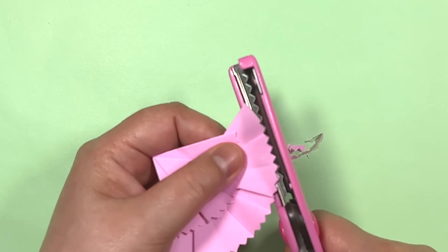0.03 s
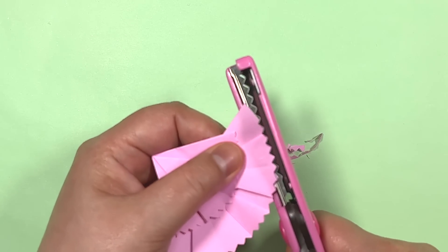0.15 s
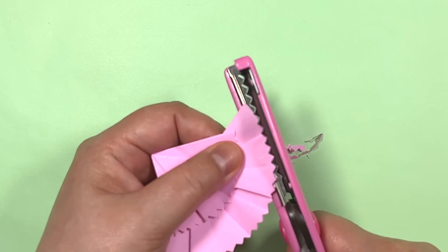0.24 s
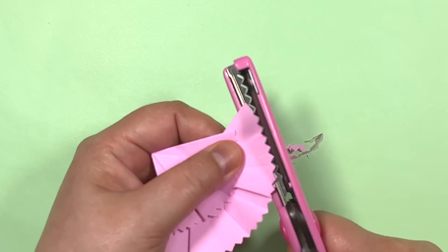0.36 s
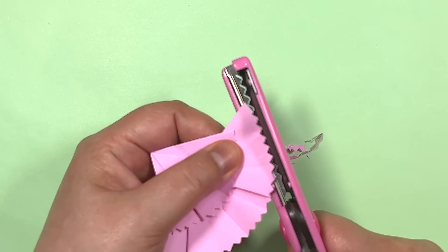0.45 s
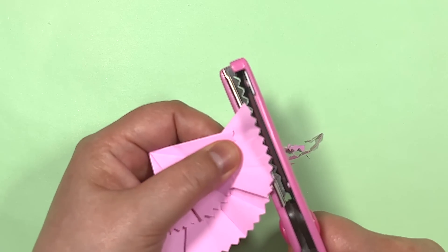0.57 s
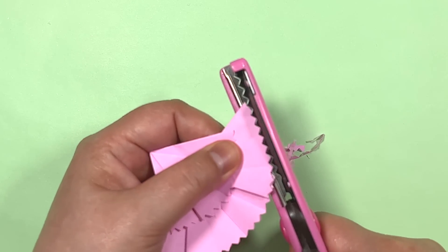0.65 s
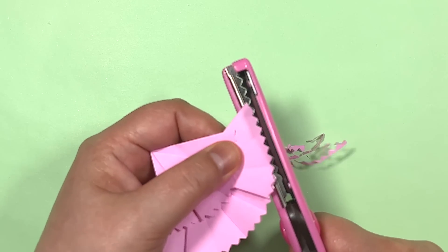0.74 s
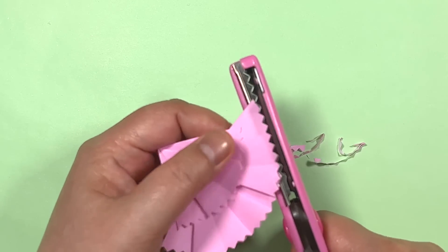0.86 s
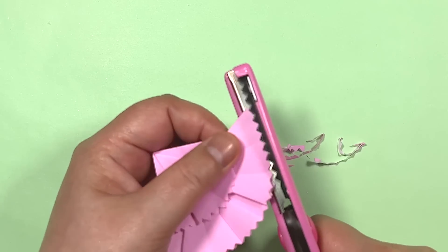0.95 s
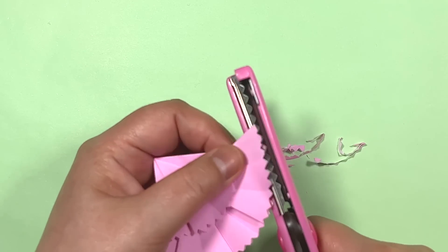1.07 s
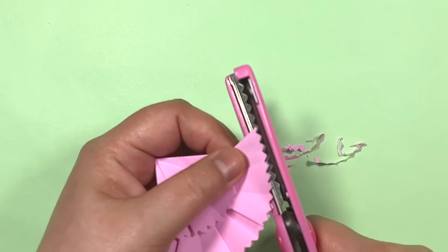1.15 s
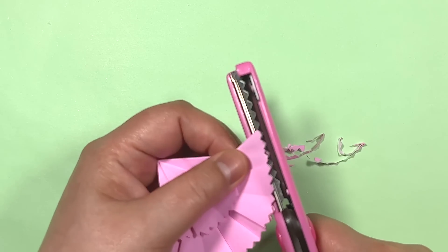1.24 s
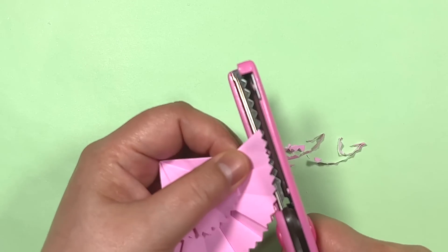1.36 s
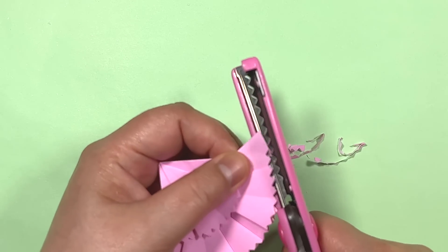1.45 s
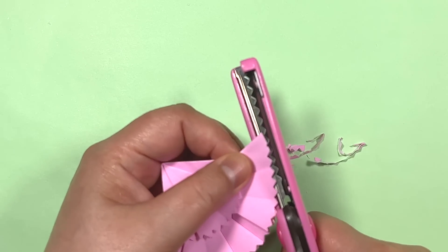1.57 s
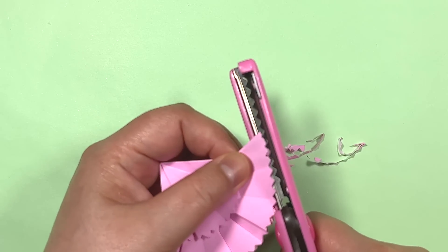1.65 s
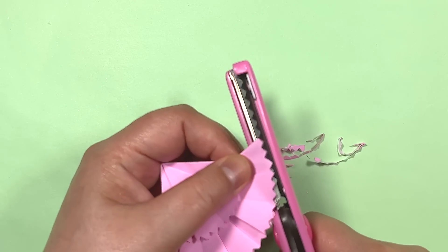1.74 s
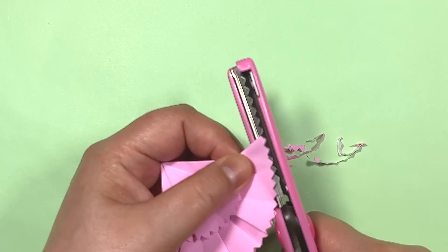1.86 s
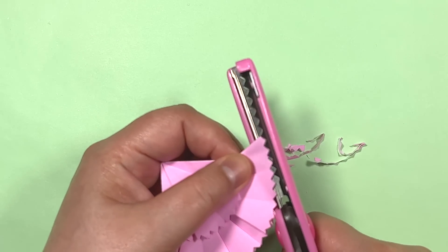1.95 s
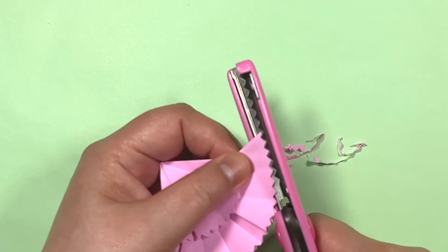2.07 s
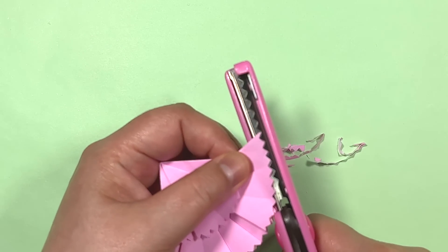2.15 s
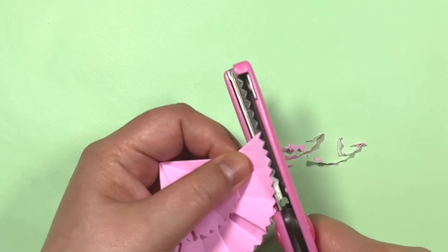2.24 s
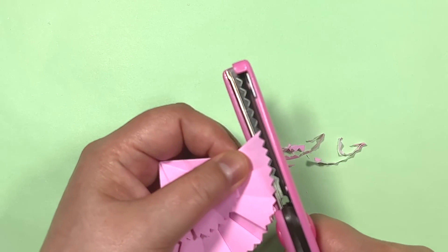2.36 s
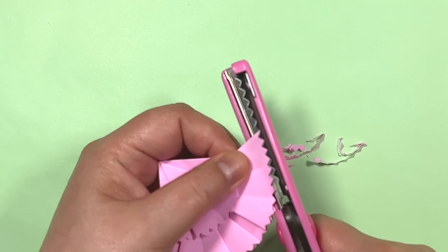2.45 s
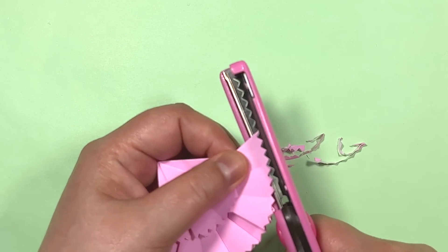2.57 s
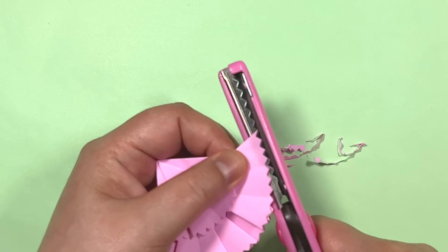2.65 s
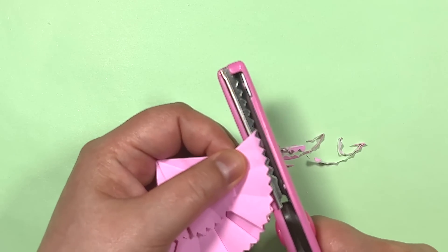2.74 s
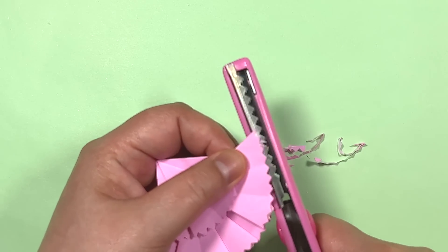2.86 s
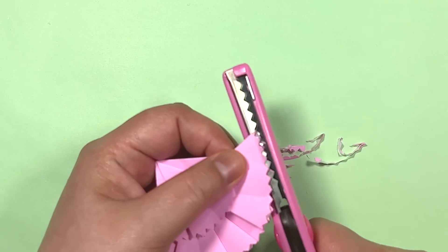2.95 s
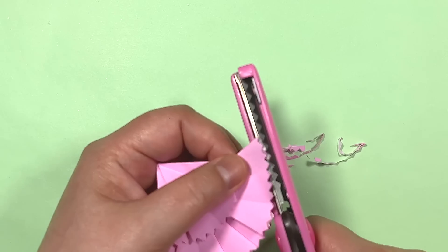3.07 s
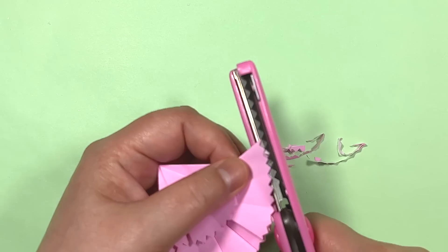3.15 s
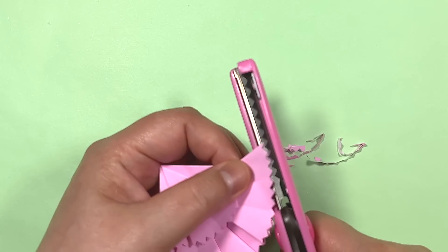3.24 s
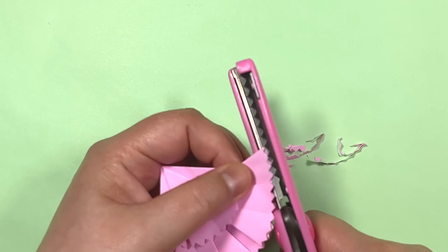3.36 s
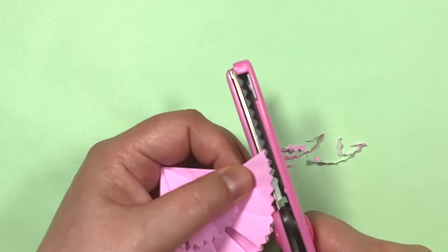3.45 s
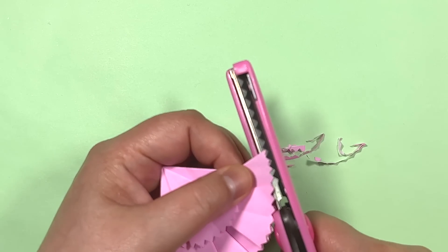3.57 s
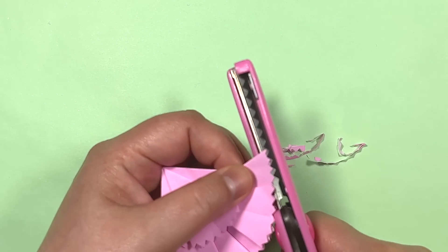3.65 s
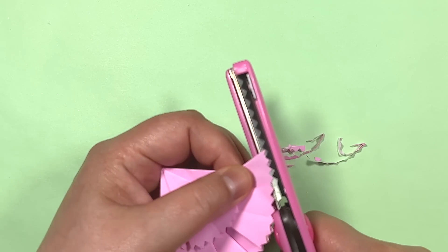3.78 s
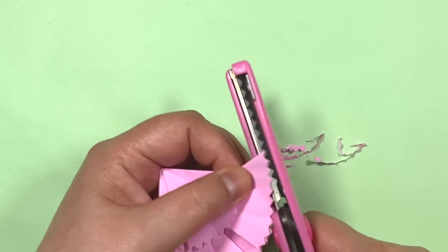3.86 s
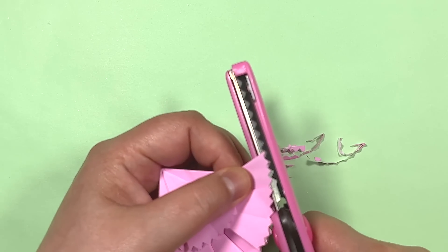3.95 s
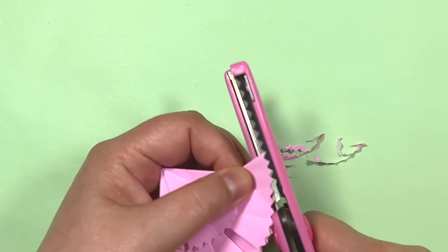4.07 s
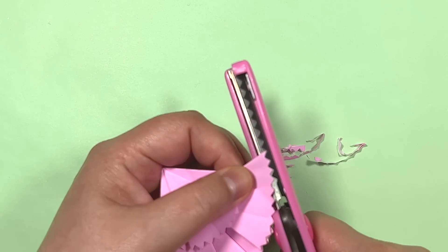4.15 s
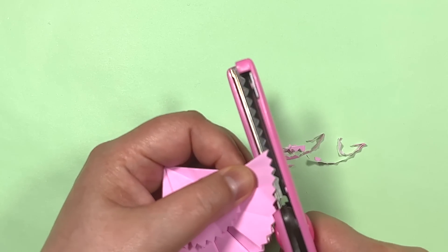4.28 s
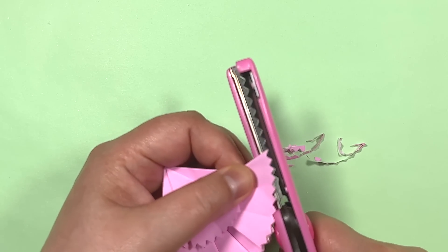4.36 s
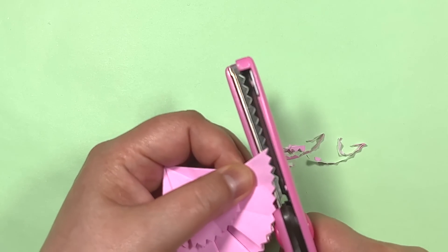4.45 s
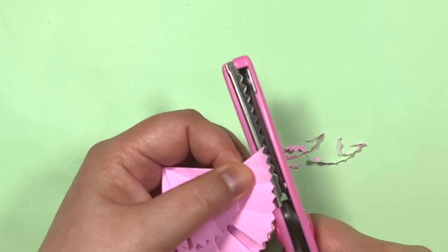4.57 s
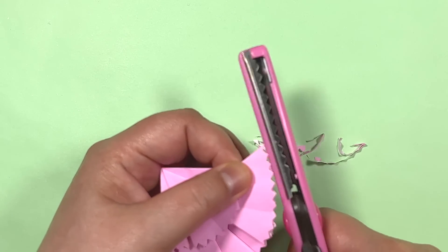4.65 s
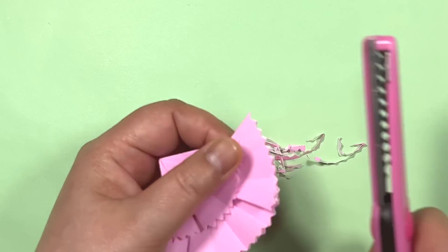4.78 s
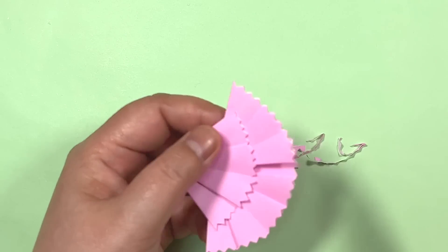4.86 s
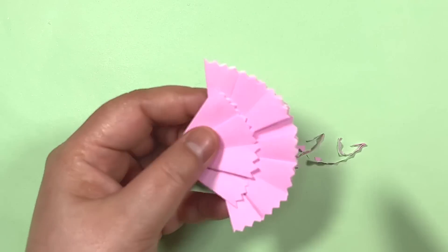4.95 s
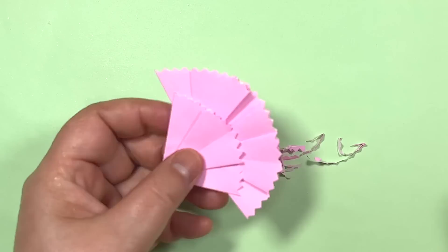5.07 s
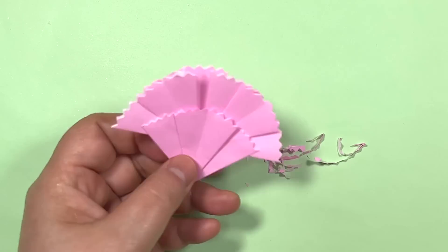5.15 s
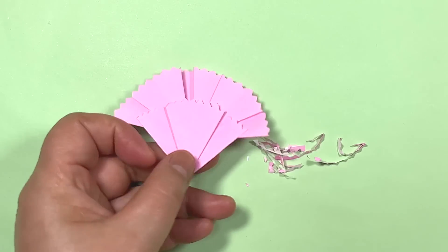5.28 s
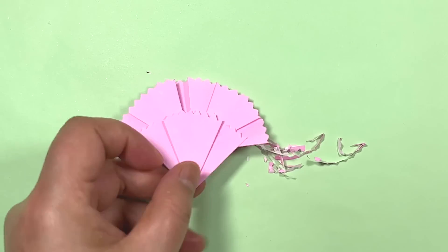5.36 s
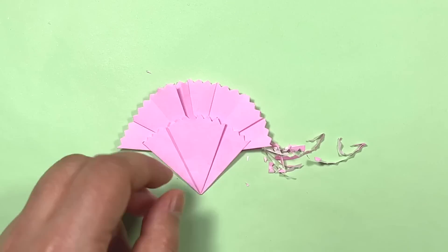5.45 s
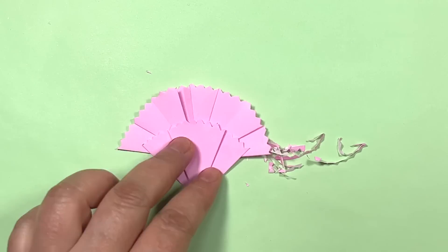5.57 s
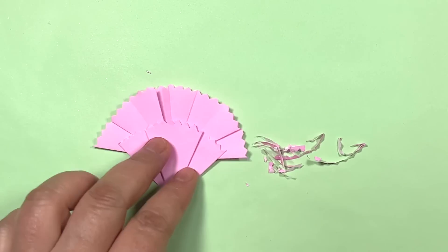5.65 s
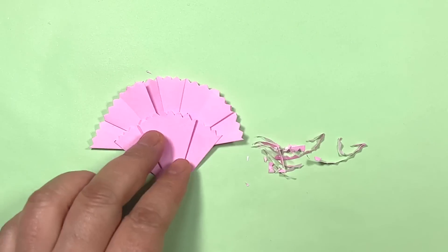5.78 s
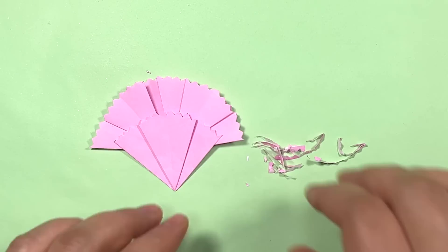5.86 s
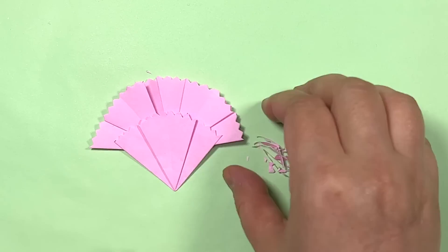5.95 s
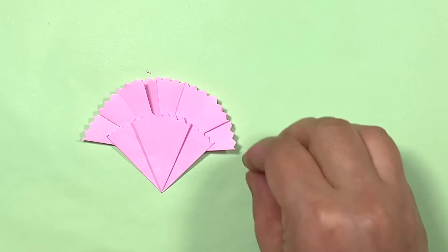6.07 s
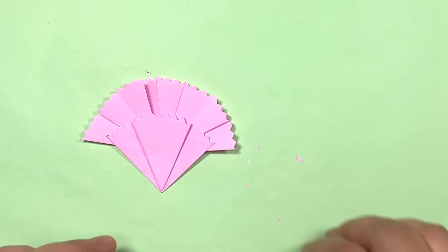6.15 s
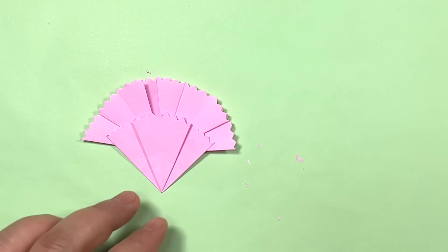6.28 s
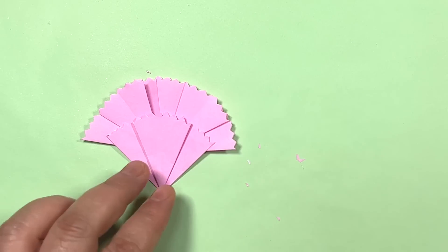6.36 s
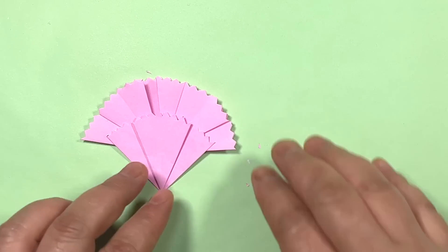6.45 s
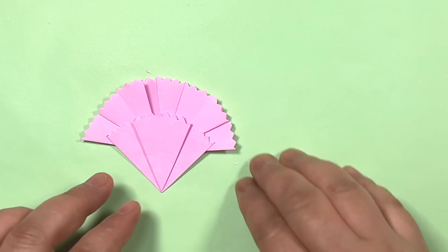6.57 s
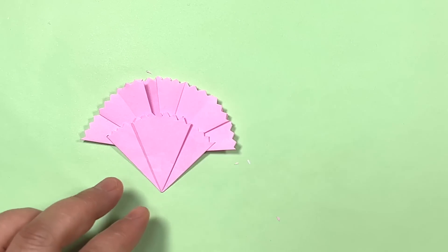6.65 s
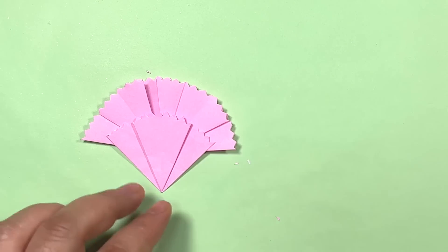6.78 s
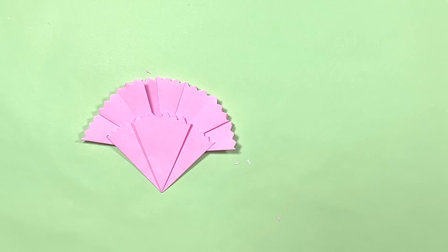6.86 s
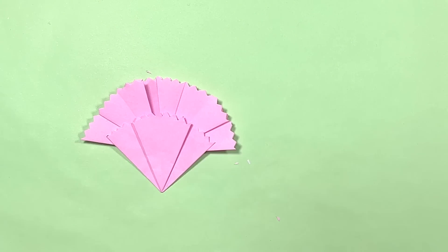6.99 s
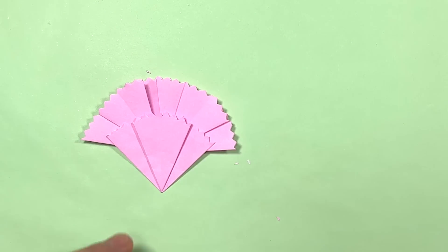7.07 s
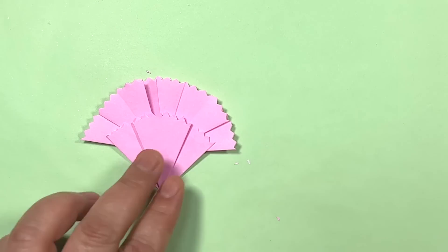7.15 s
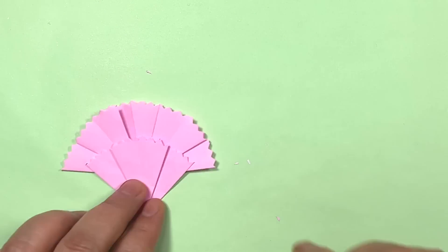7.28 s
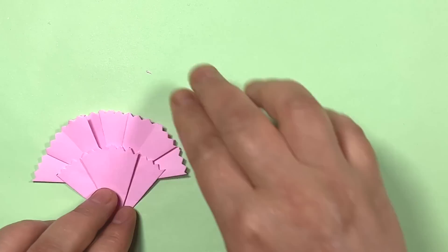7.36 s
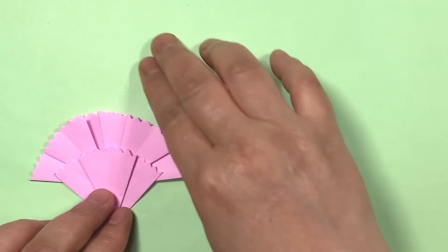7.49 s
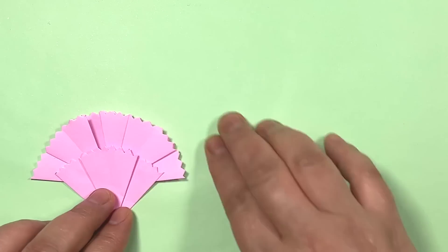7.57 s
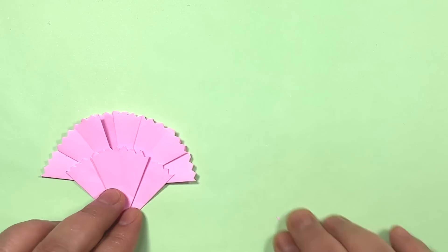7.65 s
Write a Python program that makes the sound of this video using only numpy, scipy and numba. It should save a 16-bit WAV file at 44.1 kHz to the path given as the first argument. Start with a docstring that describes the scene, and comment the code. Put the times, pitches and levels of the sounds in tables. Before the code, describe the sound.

Crisp metallic snips and crunches of folded paper with light creaks between, followed by paper slaps, rustling and two hissing hand sweeps in a quiet room.

```python
"""Pinking shears and a paper fan

Pinking shears bite through a folded paper fan on a table in a small room, heard alike in both channels.
Teeth snap the paper as bursts of fibre clicks that ring the blades, and the handles thud as damped swings.
The paper creaks and flexes between cuts; the fan is then laid down with slaps, slides and a squeak.
A hand sweeps the scraps away as filtered hiss, over room air and a faint appliance hum of wavering sines."""
import sys
import numpy as np
from scipy import signal
from scipy.fft import rfft, irfft
from scipy.io import wavfile
from scipy.ndimage import uniform_filter1d
from numba import njit

SR = 44100
rng = np.random.default_rng(int(sys.argv[2]) if len(sys.argv) > 2 else 0)


def persist_wave(psi):
    """Save psi, clipped to +-1, as 16-bit WAV."""
    counts = np.round(np.clip(psi, -1, 1) * 32767).astype(np.int16)
    wavfile.write(sys.argv[1], SR, np.atleast_2d(counts).T)


N = 340452


def db_to_gain(db):
    """Logarithmic level: 20 dB is a factor of ten in amplitude."""
    return 10 ** (np.asarray(db) / 20)


def unit(x):
    """Normalisation: scale a signal to an rms of 1."""
    return x / np.sqrt(np.mean(x ** 2))


def colour(x, points, size=2048):
    """Minimum-phase filtering: a folded cepstrum gives a causal response through (Hz, dB) points."""
    hz, db = np.transpose(points)
    bins_hz = np.maximum(np.arange(size // 2 + 1) * SR / size, 1)
    curve_db = np.interp(np.log(bins_hz), np.log(hz), db)
    cepstrum = irfft(np.log(db_to_gain(curve_db)))
    cepstrum[1:size // 2] *= 2
    cepstrum[size // 2 + 1:] = 0
    response = irfft(np.exp(rfft(cepstrum)))
    return signal.fftconvolve(x, response)[:len(x)]


def ring(x, modes):
    """Modal resonance: a sum of narrow band-passes, each given as (Hz, width in Hz, dB)."""
    total = 0
    for hz, width, db in modes:
        b, a = signal.iirpeak(hz, hz / width, SR)
        total = total + db_to_gain(db) * signal.lfilter(b, a, x)
    return total


def walk(rate):
    """Slow fluctuation: random steps at a rate in Hz, smoothed and scaled to an rms of 1."""
    hold = max(int(SR / rate), 1)
    steps = np.repeat(rng.standard_normal(N // hold + 1), hold)
    return unit(uniform_filter1d(steps, hold)[:N])


def grains(count, spread_db):
    """Granular noise: dense fibre clicks of very unequal size."""
    sizes = db_to_gain(spread_db * rng.standard_normal(count))
    return unit(rng.standard_normal(count) * sizes)


def add(track, s, sound):
    """Superposition: mix a sound in at a time in seconds."""
    i = max(int(s * SR), 0)
    track[i:i + len(sound)] += sound[:N - i]


def burst(length, fall_s, spread_db, count=3000):
    """Contact noise: grains last while the contact gives way, then decay exponentially."""
    t = np.arange(count) / SR
    fall = np.exp(-np.maximum(t - 0.77 * length, 0) / fall_s)
    onset = 1 - np.exp(-t / 0.00025)
    return grains(count, spread_db) * fall * onset


def strength(sound, db, length):
    """Energy equivalence: a short sound gets the energy of a level held for a length in seconds."""
    return sound * db_to_gain(db) * np.sqrt(length * SR / np.sum(sound ** 2))


def movement_gain(rows):
    """Gaussian envelopes: each (middle s, dB, half length s) swells and fades, adding in power."""
    t = np.arange(N) / SR
    return np.sqrt(sum(db_to_gain(2 * db) * np.exp(-2 * ((t - s) / half) ** 2) for s, db, half in rows))


# Spectrum of the room air. Each row: frequency in Hz, gain in dB.
ROOM_SPECTRUM = [(25,-20.5), (90,3), (200,-4), (500,-7), (2000,-10), (3500,-15), (11000,-19.5), (16000,-30)]
ROOM_DB = -60.5


def room_air():
    """Stationary noise: steady coloured air sound at a fixed rms level."""
    return unit(colour(rng.standard_normal(N), ROOM_SPECTRUM)) * db_to_gain(ROOM_DB)


# Partials of the appliance hum. Each row: frequency in Hz, rms level in dB.
HUM_PARTIALS = [(444.3, -68), (888.6, -81), (1333, -77)]


def appliance_hum():
    """Phase modulation: steady sines share a wandering time base, so their pitch wavers together."""
    t = np.arange(N) / SR + 0.0001 * walk(2.21)
    return sum(np.sqrt(2) * db_to_gain(db) * np.sin(2 * np.pi * hz * t) for hz, db in HUM_PARTIALS)


# The hands lean on the table. Each row: middle in seconds, level in dB, half length in seconds.
LEANING_HANDS = [(0.01,-53,0.031), (0.52,-69,0.34), (5.55,-60.5,0.59)]
SETTLE_S, SETTLE_DB = 0.025, -2.5  # decay of the shaking after each thud, and its level


def rumble(knocks):
    """Energy storage: low noise follows the leaning hands and the leaky average of thud power."""
    x = colour(rng.standard_normal(N), [(30, -27), (75, 3), (170, -3.5), (330, -6.5), (2000, -44.0)])
    keep = np.exp(-1 / (SETTLE_S * SR))
    shaking = signal.lfilter([1 - keep], [1, -keep], knocks ** 2 + 1e-18)  # power stays above zero
    power = db_to_gain(2 * SETTLE_DB) * shaking + movement_gain(LEANING_HANDS) ** 2
    return unit(x) * np.sqrt(power)


# The heel of the hand comes down softly. Each row: start in seconds, level in dB.
HAND_BUMPS = [(0.02,-44), (0.745,-48), (5.855,-46), (5.945,-43), (6.022,-46)]
BUMP_HZ, BUMP_FALL_S = 88, 0.0063
# Low swings of handles and table top. Each row: nominal frequency in Hz, fall in seconds, level in dB.
HANDLE_SWINGS = [(180, 0.006, -2.5), (95, 0.007, -9.5)]
THUD_LAG_S = 0.0028  # a thud follows its contact


def thuds(rows, swings, count=4000):
    """Damped oscillation: each contact sets off low swings of alternating sign and varying pitch."""
    out, t = np.zeros(N), np.arange(count) / SR
    for s, *_, db in rows:
        for k, (nominal_hz, fall_s, swing_db) in enumerate(swings):
            oscillation = np.sin(2 * np.pi * nominal_hz * rng.uniform(0.82, 1.1) * t)
            envelope = np.exp(-t / fall_s) * (1 - np.exp(-2 * nominal_hz * t))
            swing = np.gradient(oscillation * envelope)
            swing = swing / np.abs(swing).max()
            add(out, s + THUD_LAG_S, (-1) ** k * db_to_gain(db + swing_db) * swing)
    return out


# Spectrum of cut paper. Each row: frequency in Hz, gain in dB.
CUT_SPECTRUM = [(100,-18), (520,-3.5), (760,-0.5), (2400,-1), (3500,-3), (5800,-5.5), (8000,-2),
                (11500,-0.5), (12700,-10.5), (14000,-7.5), (16000,-22)]
# Resonances of blades and folded paper. Each row: frequency in Hz, width in Hz, gain in dB.
BLADE_MODES = [(3020, 110, -3.5), (4730, 140, -8), (7120, 170, 0.5), (9780, 610, -5.5), (12800, 290, -13),
               (13600, 1200, -4)]


def fracture(db, length, treble_db, low_db, fall_s):
    """Fracture noise: breaking fibres excite the blade modes, with given low-mid and treble weight."""
    x = colour(burst(length, fall_s, spread_db=4.0), CUT_SPECTRUM)
    x = x + db_to_gain(1.0) * ring(x, BLADE_MODES)
    tilt = [(450, -4.0), (850, low_db), (1900, 0.58), (4200, -3.0), (7000, treble_db)]
    return strength(colour(x, tilt), db, length)


# Low-mid weight as the grip on the fan changes. Each row: time in seconds, gain in dB.
GRIP_WEIGHT = [(.2,-10), (.6,1), (2.6,-7), (4.5,-8)]


def bite(s, db, length, treble_db):
    """Load-dependent fracture: the grip sets the low-mids, and longer bites die out more slowly."""
    low_db = np.interp(s, *np.transpose(GRIP_WEIGHT))
    return fracture(db, length, treble_db, low_db, fall_s=0.0005 + 0.52 * length)


# The jaws scrape to a new bite and the handles knock.
# Each row: start in seconds, level in dB, treble in dB, thud level in dB.
JAW_CATCHES = [(0.178,-44.5,-1.5,-46.5), (0.3133,-37,-2.5,-34), (0.409,-31,-3.5,-36.5),
               (0.540,-40,-2,-32.5), (0.552,-44.5,-6,-53), (2.283,-44.5,-4,-40), (2.390,-44,-4.5,-41),
               (2.451,-40.5,-7,-45), (4.328,-48.5,0,-63), (4.3877,-35.5,-6,-47)]
CATCH_S, DRAG_DB, DRAG_S = 0.005, -23, 0.012  # edges drag before and after; DRAG_DB re the catch
# A tooth snaps through the paper and jolts the handles.
# Each row: start in seconds, level in dB, length in seconds, treble in dB, thud level in dB.
TOOTH_SNAPS = [(0.6181,-10,0.0021,-1.5,-29), (0.648,-33.5,0.0036,-1,-50), (0.825,-28,0.0016,-9.5,-54),
               (0.8585,-22,0.0012,-1,-50), (0.931,-40,0.0013,-15,-56), (0.999,-33,0.0029,-3.5,-50),
               (1.0232,-35.5,0.0031,-1.5,-66), (2.6413,-22.5,0.0067,0,-38.5),
               (2.688,-30.5,0.0019,-15.5,-36), (2.72,-35,0.0042,-13,-46), (2.7339,-25.5,0.0025,-3,-44),
               (2.794,-29,0.0031,-4.5,-67), (2.98,-29,0.0052,-5.5,-38.5), (3.005,-33,0.0042,-6.5,-54),
               (4.435,-39.5,0.0034,-12,-51), (4.448,-30,0.0027,-10,-53), (4.473,-21,0.00079,0,-45),
               (4.528,-38.5,0.0026,-18,-43), (4.549,-38,0.0035,-14,-49), (4.563,-26.5,0.0059,-7,-40.5)]
# First fibres give before a snap: lead, level re the snap, and the snap level above which it stops rising.
STRAIN_LEAD_S, STRAIN_DB, STRAIN_LIMIT_DB = 0.0042, -19.5, -31.5
# Blades crunch through a thick fold.
# Each row: start in seconds, level in dB, length in seconds, treble in dB, thud level in dB.
FOLD_CRUNCHES = [(0.944,-36,0.028,-5,-39), (2.651,-34.5,0.015,-4,-47), (2.947,-26,0.02,-3,-40.5),
                 (4.578,-32,0.02,-7,-45)]
# Spacing of the paper layers, random timing and level spread, length of one layer's snap.
LAYER_S, LAYER_JITTER_S, LAYER_SCATTER_DB, LAYER_SNAP_S = 0.0052, 0.0008, 3.5, 0.004
# Teeth that catch hard and ring one blade mode. Each row: start in seconds, level in dB, frequency in Hz.
BLADE_PINGS = [(0.621,-6,12100), (2.646,-14.5,3000), (2.689,-24,2900), (2.736,-15,2990), (2.793,-23.5,2080),
               (2.957,-21,2760), (2.986,-16.5,7160), (4.472,-14.5,4970), (4.567,-18,2790)]
PING_CYCLES = 4.1  # cycles per decay time, so higher modes die sooner


def shears(count=2000):
    """Stick and fracture: edges drag and catch, teeth strain and snap, folds crunch, blades ring damped."""
    out, t = np.zeros(N), np.arange(count) / SR
    for s, db, treble_db, _ in JAW_CATCHES:
        add(out, s - CATCH_S, bite(s, db + DRAG_DB, CATCH_S, treble_db))
        add(out, s, bite(s, db, CATCH_S, treble_db))
        add(out, s + CATCH_S, bite(s, db + DRAG_DB, DRAG_S, treble_db))
    for s, db, length, treble_db, _ in TOOTH_SNAPS:
        strain_db = min(db, STRAIN_LIMIT_DB) + STRAIN_DB
        add(out, s - STRAIN_LEAD_S, bite(s, strain_db, STRAIN_LEAD_S, treble_db))
        add(out, s, bite(s, db, length, treble_db))
    for s, db, length, treble_db, _ in FOLD_CRUNCHES:
        for layer_s in np.arange(s, s + length, LAYER_S):
            late, louder = rng.standard_normal(2)
            layer_db = db + LAYER_SCATTER_DB * louder
            add(out, layer_s + LAYER_JITTER_S * late, bite(s, layer_db, LAYER_SNAP_S, treble_db))
    for s, db, hz in BLADE_PINGS:
        add(out, s, db_to_gain(db) * np.sin(2 * np.pi * hz * t) * np.exp(-hz * t / PING_CYCLES))
    return out


# Folded paper flexes against the blades. Each row: middle in seconds, level in dB, half length in seconds.
PAPER_FLEXING = [(0.818,-53.5,0.03), (0.98,-48,0.027), (1.12,-57.5,0.092), (1.70,-56,0.046),
                 (1.803,-47,0.01), (1.998,-47.5,0.018), (2.27,-57.5,0.017), (2.84,-56,0.12),
                 (3.275,-50.5,0.017), (3.35,-58.5,0.073)]
RELAX_LAG_S, RELAX_DB, RELAX_HALF_S = 0.01, -52.5, 0.022  # the paper springs back after each cut
# Spectrum of flexing paper. Each row: frequency in Hz, gain in dB.
FLEX_SPECTRUM = [(400,-18), (800,-7), (1200,1), (2050,4), (3000,-8), (6000,-14), (10500,-15), (16000,-40)]
# The fan slides over fingers and table. Each row: middle in seconds, level in dB, half length in seconds.
FAN_SLIDING = [(4.78,-54.5,0.039), (5.237,-52,0.038), (5.39,-50.5,0.1), (5.66,-55,0.23), (5.92,-59.5,0.14)]
# Spectrum of sliding paper. Each row: frequency in Hz, gain in dB.
RUSTLE_SPECTRUM = [(120,-28), (300,1.5), (1900,-2), (3600,-6.5), (4600,-5.5), (5400,-11), (11000,-12),
                   (16000,-29)]


def rustle(rows, spectrum, rate, fits_db, slide_db, crackle_db):
    """Stick-slip friction: paper slips in fits and starts, with random crackles at a rate per second."""
    fits = db_to_gain(fits_db * np.tanh(walk(140)))
    slide = unit(colour(grains(N, spread_db=5.5), spectrum) * fits)
    clicks = (rng.random(N) < rate / SR) * rng.standard_normal(N)
    crackle = signal.fftconvolve(clicks, burst(0.00038, 0.00048, spread_db=1.0))[:N]
    crackle = unit(colour(crackle, spectrum))
    return (db_to_gain(slide_db) * slide + db_to_gain(crackle_db) * crackle) * movement_gain(rows)


# The fingers turn the fan and creases tick.
# Each row: start in seconds, end in seconds, ticks per second, mean level in dB.
FAN_TURNS = [(1.04, 2.15, 21, -50), (3.034, 3.65, 8.6, -51), (5.21, 5.45, 40, -48)]
TICK_SCATTER_DB, TICK_TREBLE_DB = 8.5, -6  # level spread either way, mean treble
# Single creases give way; the row at 6.349 s is a paper scrap ticking under the sweeping hand. # Each row:
# start in seconds, level in dB, treble in dB, frequency of the panel ring in Hz.
CREASE_CREAKS = [(1.1853,-38.5,-5,2250), (1.424,-40,-7,1600), (1.491,-45,1,2000), (1.589,-50,11,2400),
                 (1.63,-41,4,2000), (1.645,-46,7,2600), (1.6867,-39.5,-6,1500), (1.774,-32,3.5,2440),
                 (1.974,-43.5,-3,2100), (1.9934,-40,-20,1750), (2.096,-43.5,6.5,2180),
                 (3.379,-42.5,-3.5,2120), (3.7264,-35,-4,1950), (3.9745,-42,-14.5,1750),
                 (4.7675,-37,6.5,1900), (4.857,-44.5,-4,3000), (5.0307,-37,1.5,818), (6.349,-46,-6,5600),
                 (6.9468,-37.5,-0.5,2900)]
PANEL_Q, PANEL_DB = 3.8, 5.5  # the panel beside a crease rings briefly


def creaks():
    """Buckling: single creases, a scrap and random ticks give way suddenly and ring the panel beside them."""
    out, ticks = np.zeros(N), []
    for start, end, rate, db in FAN_TURNS:
        for place, louder, brighter, higher in rng.random((int((end - start) * rate), 4)):
            s = start + place * (end - start)
            tick_db = db + TICK_SCATTER_DB * (2 * louder - 1)
            treble_db = TICK_TREBLE_DB + 7 * (2 * brighter - 1)
            ticks.append((s, tick_db, treble_db, 1200 * 2 ** higher))
    for s, db, treble_db, hz in CREASE_CREAKS + ticks:
        crack = colour(burst(0.00088, 0.0017, spread_db=4.0), CUT_SPECTRUM)
        crack = crack + ring(crack, [(hz, hz / PANEL_Q, PANEL_DB)])
        crack = colour(crack, [(650, -9), (1400, -3), (3500, -1), (7000, treble_db)])
        add(out, s, strength(crack, db, 0.0013))
    return out


# Fingertips land on the table.
# Each row: start in seconds, level in dB, length in seconds, thud level in dB.
FINGER_TAPS = [(2.897,-46,0.0047,-65), (5.446,-31,0.0084,-31), (5.627,-39,0.0052,-33),
               (6.506,-49.5,0.0045,-57), (7.349,-50.5,0.0076,-48)]
# Spectrum of fingertips and scuffs. Each row: frequency in Hz, gain in dB.
FINGER_SPECTRUM = [(80, -11), (250, 3.5), (650, 8), (1100, -11.5), (4000, -22), (16000, -35)]
# The stiff fan slaps the table as it is pressed flat.
# Each row: start in seconds, level in dB, length in seconds, thud level in dB.
FAN_SLAPS = [(5.6468,-24,0.00303,-40), (5.706,-24,0.00354,-29)]
# Spectrum of the slaps. Each row: frequency in Hz, gain in dB.
SLAP_SPECTRUM = [(120,-13), (350,3), (800,4.5), (1800,-7), (2400,-2.5), (2850,-8.5), (3400,2.5), (4400,3.5),
                 (4800,-17.5), (10200,-16.5), (16000,-52)]
SCUFF_DB, SCUFF_S = -20.5, 0.02  # whatever lands scuffs on a little; level re the contact


def taps(rows, body, fall_s):
    """Impact and friction: a short contact coloured by what lands, then a soft scuff."""
    out = np.zeros(N)
    for s, db, length, _ in rows:
        contact = colour(burst(length, fall_s, spread_db=1.5), body)
        add(out, s, strength(contact, db, length))
        scuff = colour(burst(SCUFF_S, SCUFF_S / 2, spread_db=4), FINGER_SPECTRUM)
        add(out, s + length, strength(scuff, db + SCUFF_DB, SCUFF_S))
    return out


# An edge of the fan squeaks on the table as it is laid down.
SQUEAK_S, SQUEAK_HALF_S, SQUEAK_HZ, SQUEAK_WIDTH_HZ, SQUEAK_DB = 5.19, 0.027, 5070, 220, -64


def squeak():
    """Frictional resonance: a chattering paper edge drives one narrow band briefly."""
    chatter = ring(grains(N, spread_db=-2), [(SQUEAK_HZ, SQUEAK_WIDTH_HZ, 0)])
    return unit(chatter) * movement_gain([(SQUEAK_S, SQUEAK_DB, SQUEAK_HALF_S)])


STROKE_RELEASE_S = 0.099  # time to fade by 20 dB; the rise spans 20 dB too
GLIDE_CURVE = 2.6  # the hand changes shape ever faster through the hold


def strokes(rows):
    """Exponential envelopes: strokes rise, hold and release as cavities glide (gain, two Hz, ring gain)."""
    t, gain, shape = np.arange(N) / SR, 0, 0
    for s, held, db, rise, hollow_from, hollow_to, gap_from, gap_to, ring_db in rows:
        before = np.maximum(s - t, 0) / rise
        after = np.maximum(t - s - held, 0) / STROKE_RELEASE_S
        stroke = db_to_gain(db - 20 * before - 20 * after) + 1e-12  # never zero, for the division below
        glide = np.clip((t - s) / held, 0, 1) ** GLIDE_CURVE
        hollow_hz = hollow_from + glide * (hollow_to - hollow_from)
        gap_hz = gap_from + glide * (gap_to - gap_from)
        gain = gain + stroke
        shape = shape + stroke * np.array([hollow_hz, gap_hz, np.full(N, db_to_gain(ring_db))])
    return (gain, *(shape / gain))


@njit
def cavity(x, hz, q):
    """Cavity resonance: a state-variable band-pass with a moving centre and a gain of 1 there."""
    y, band, low = np.empty(len(x)), 0., 0.
    for i in range(len(x)):
        g = np.tan(np.pi * hz[i] / SR)
        v = (band + g * (x[i] - low)) / (1 + g * (g + 1 / q))
        band, low, y[i] = 2 * v - band, low + 2 * g * v, v / q
    return y


# Strokes that sweep the scraps away. Each row: time of full speed in seconds, hold in seconds, level in dB,
# rise in seconds, hollow of the palm from Hz, to Hz, gap under the fingers from Hz, to Hz, ring in dB.
SWEEP_STROKES = [(6.14, 0.1, -43, 0.25, 656, 760, 3600, 6800, -3),
                 (6.58, 0.14, -46, 0.098, 650, 875, 2680, 5500, 2.5)]
# Spectrum of the sweeping hand. Each row: frequency in Hz, gain in dB.
SWEEP_SPECTRUM = [(200,-5), (900,-3), (1800,-5.5), (3000,-3.5), (6500,-3), (11800,-2), (14000,-8),
                  (16000,-18)]
# Strokes of the palm over table and fan. Each row: time of full speed in seconds, hold in seconds,
# level in dB, rise in seconds, hollow from Hz, to Hz, gap from Hz, to Hz, ring in dB.
PALM_STROKES = [(6.43, 0.081, -59, 0.23, 620, 640, 3370, 2800, 0),
                (7.23, 0.11, -51.5, 0.088, 1360, 1250, 3360, 2470, -4),
                (7.535, 0.2, -49.5, 0.12, 680, 950, 2960, 2650, 2)]
# Spectrum of the smoothing palm. Each row: frequency in Hz, gain in dB.
PALM_SPECTRUM = [(200,-10.5), (700,-5.5), (1500,-11), (2900,-6.5), (5500,-6.5), (12000,-10), (16000,-27)]
TREBLE_LAG_S = 0.015  # a stroke starts dull and ends bright
CAVITY_Q = 6.5


def rub(rows, spectrum, rough_db):
    """Sliding friction: faster is brighter, and hiss rings the hollow of the palm and the finger gap."""
    speed, hollow_hz, gap_hz, ringing = strokes(rows)
    hiss = unit(colour(grains(N, spread_db=1.5), spectrum))
    low = signal.sosfiltfilt(signal.butter(2, 5000, fs=SR, output="sos"), hiss)
    late_speed = np.interp(np.arange(N) - TREBLE_LAG_S * SR, np.arange(N), speed)
    high = (hiss - low) * (late_speed / speed.max()) ** 0.63 * db_to_gain(2.0)
    drift = 1 + 0.028 * walk(15)
    cavities = sum(cavity(hiss, hz * drift, float(CAVITY_Q)) for hz in (hollow_hz, gap_hz))
    roughness = db_to_gain(rough_db * walk(90))
    return (low + high + ringing * cavities) * roughness * speed


def room(x, strong_db, strong_t60, weak_db, weak_t60, count=14000):
    """Reverberation: convolve with two decaying noise tails, the weaker of them shorter."""
    t = np.arange(count) / SR
    response = np.zeros(count)
    for db, t60 in ((strong_db, strong_t60), (weak_db, weak_t60)):
        decay = np.exp(-np.log(1000) * t / t60)  # 60 dB down at t60
        tail = rng.standard_normal(count) * decay * (1 - np.exp(-t / 0.00067))
        response += db_to_gain(db) * tail / np.sqrt(np.sum(tail ** 2))
    response = colour(response, [(150, 5), (500, -4.0), (9000, -3), (16000, -16.5)])
    return signal.fftconvolve(x, response)[:N]


def scene():
    """Superposition of sources: cutting, laying down and sweeping, heard alike in both channels."""
    knocks = thuds(TOOTH_SNAPS + FOLD_CRUNCHES + JAW_CATCHES + FINGER_TAPS + FAN_SLAPS, HANDLE_SWINGS)
    bumps = thuds(HAND_BUMPS, [(BUMP_HZ, BUMP_FALL_S, 0)])
    floor = room_air() + appliance_hum() + rumble(knocks) + bumps
    relaxing = [(s + RELAX_LAG_S, RELAX_DB, RELAX_HALF_S) for s, *_ in TOOTH_SNAPS + FOLD_CRUNCHES]
    flexing = rustle(PAPER_FLEXING + relaxing, FLEX_SPECTRUM,
                     rate=150, fits_db=10.5, slide_db=-4, crackle_db=-0.5)
    fingers = taps(FINGER_TAPS, FINGER_SPECTRUM, fall_s=0.0035)
    sliding = rustle(FAN_SLIDING, RUSTLE_SPECTRUM, rate=180, fits_db=5.5, slide_db=1, crackle_db=-6.5)
    slaps = taps(FAN_SLAPS, SLAP_SPECTRUM, fall_s=0.00093)
    laying = fingers + sliding + squeak() + slaps
    sweeping = rub(SWEEP_STROKES, SWEEP_SPECTRUM, rough_db=1.2)
    smoothing = rub(PALM_STROKES, PALM_SPECTRUM, rough_db=0.75)
    near = shears() + flexing + creaks() + laying + sweeping + smoothing
    reverberant = room(near, strong_db=-9, strong_t60=0.069, weak_db=-17.0, weak_t60=0.031)
    mono = near + reverberant + knocks + floor
    return np.array([mono, mono])


TOP_HZ = 16000


def record(dry):
    """Band limiting: the microphone thins the deep bass and the recorder cuts the very top."""
    thin = signal.sosfilt(signal.butter(2, 50, "high", fs=SR, output="sos"), dry)
    return signal.sosfilt(signal.ellip(10, .2, 80, TOP_HZ, fs=SR, output="sos"), thin)


dry = scene()
out = record(dry)
persist_wave(out)
```